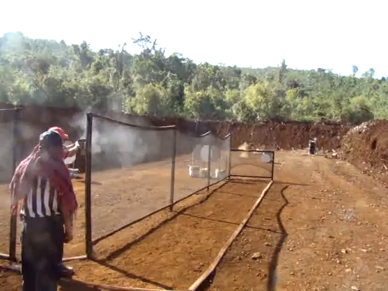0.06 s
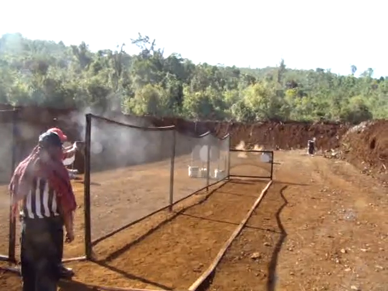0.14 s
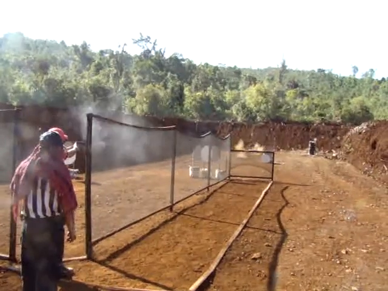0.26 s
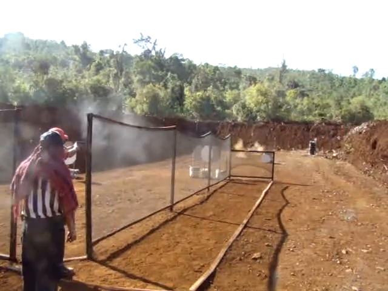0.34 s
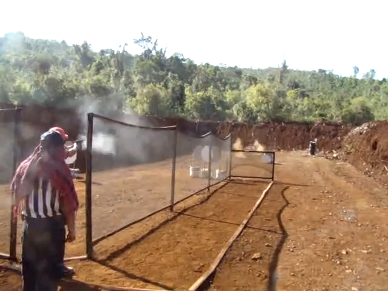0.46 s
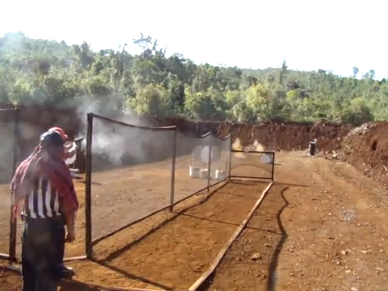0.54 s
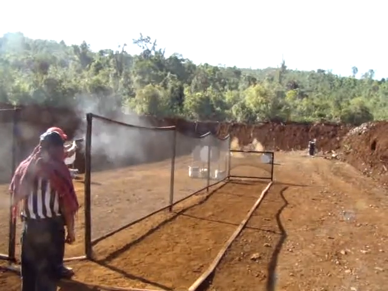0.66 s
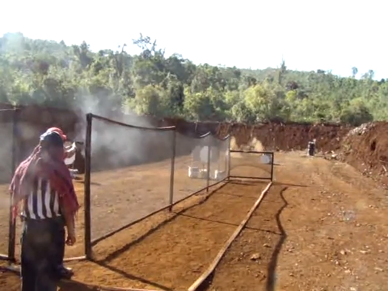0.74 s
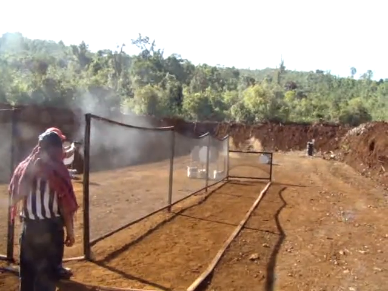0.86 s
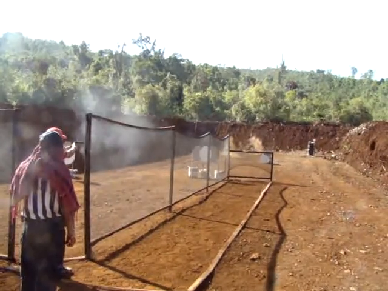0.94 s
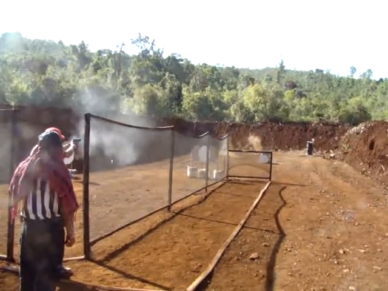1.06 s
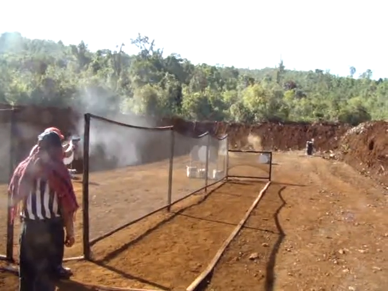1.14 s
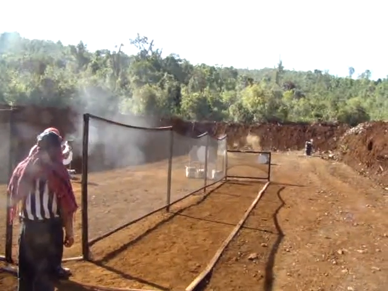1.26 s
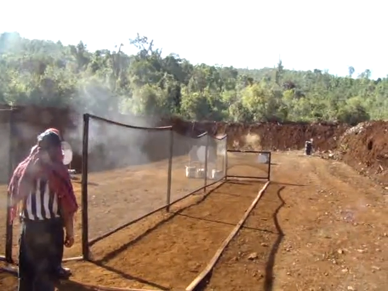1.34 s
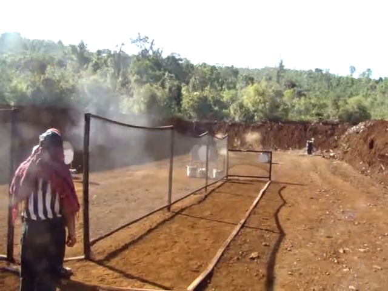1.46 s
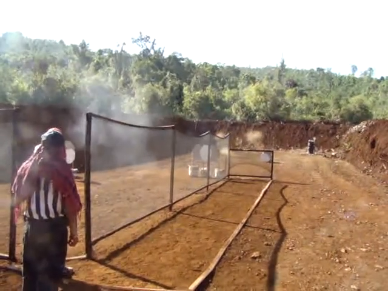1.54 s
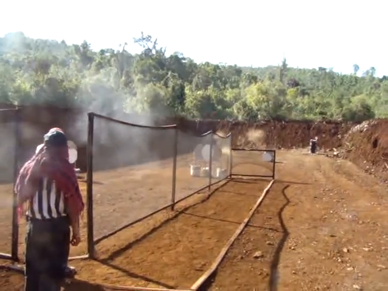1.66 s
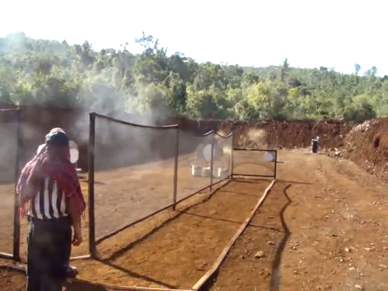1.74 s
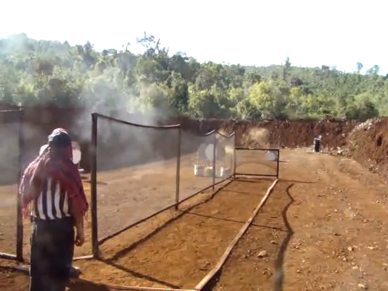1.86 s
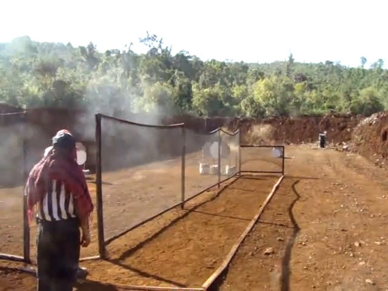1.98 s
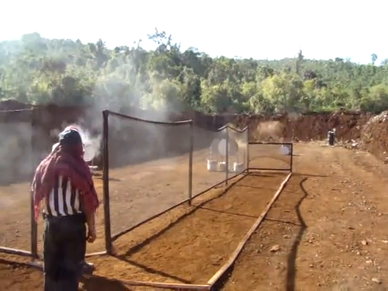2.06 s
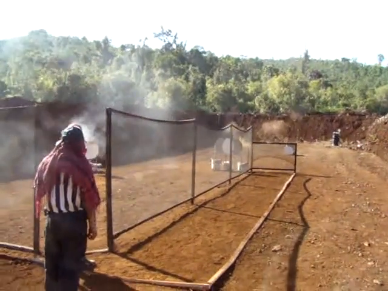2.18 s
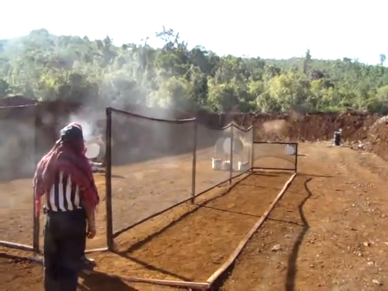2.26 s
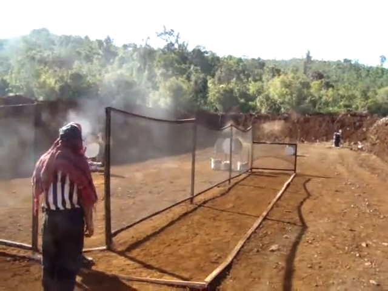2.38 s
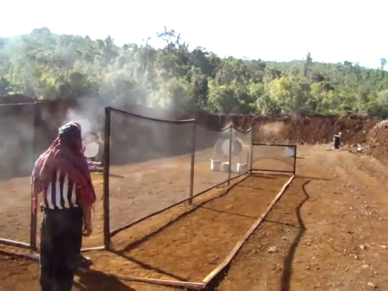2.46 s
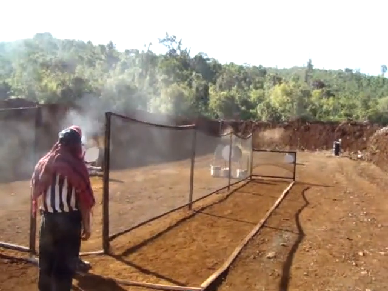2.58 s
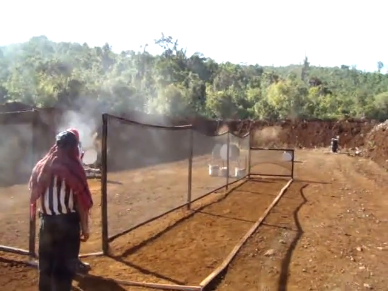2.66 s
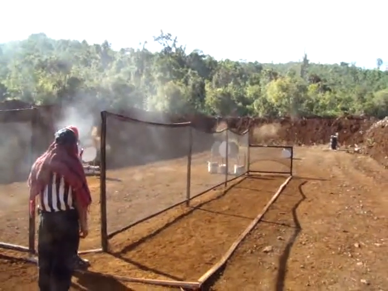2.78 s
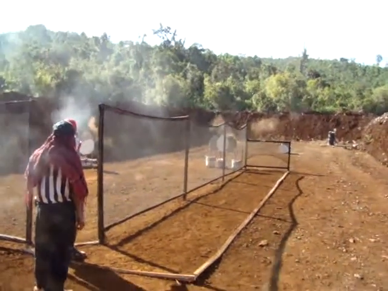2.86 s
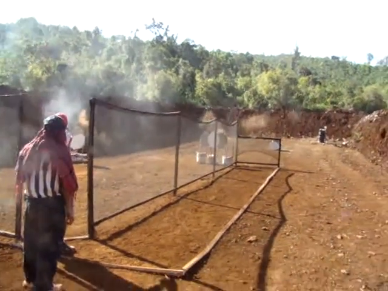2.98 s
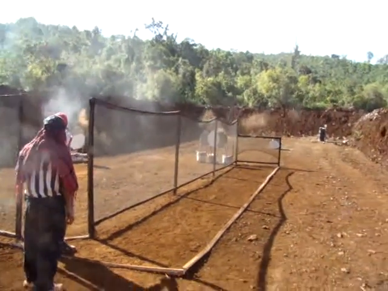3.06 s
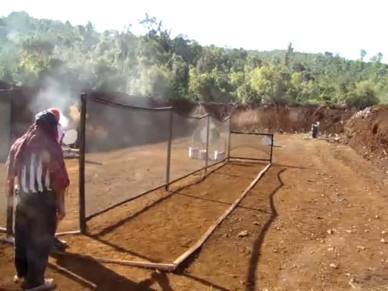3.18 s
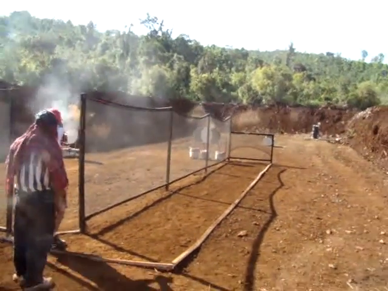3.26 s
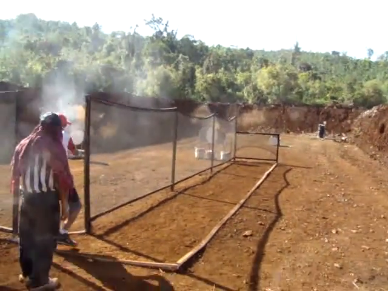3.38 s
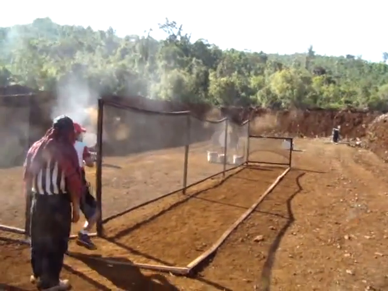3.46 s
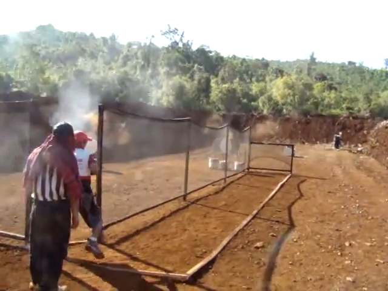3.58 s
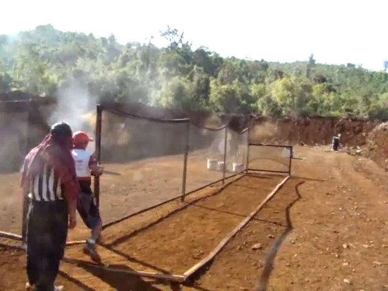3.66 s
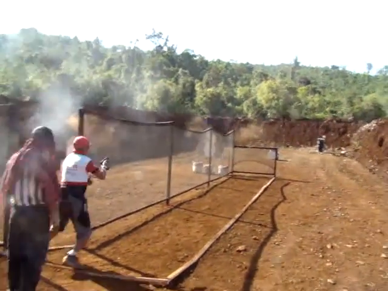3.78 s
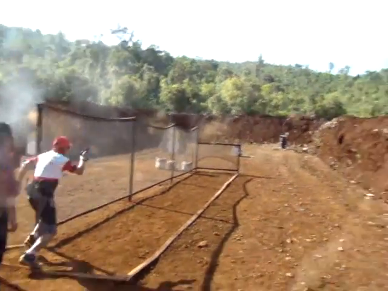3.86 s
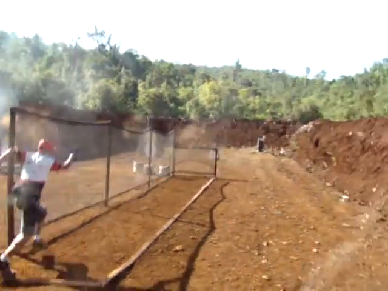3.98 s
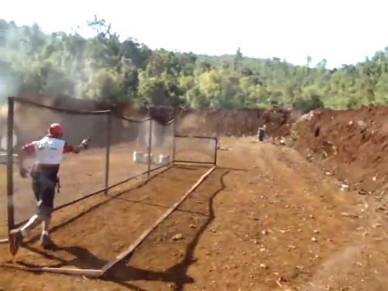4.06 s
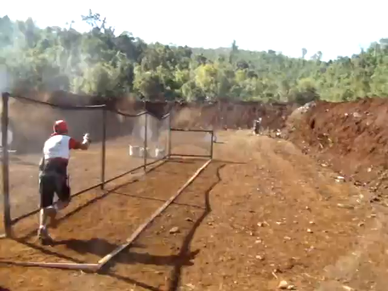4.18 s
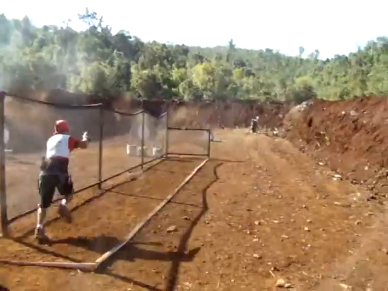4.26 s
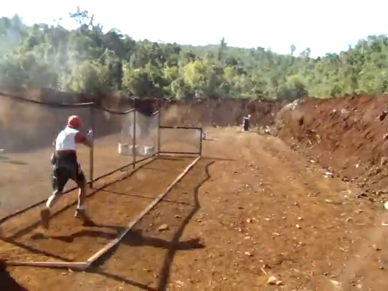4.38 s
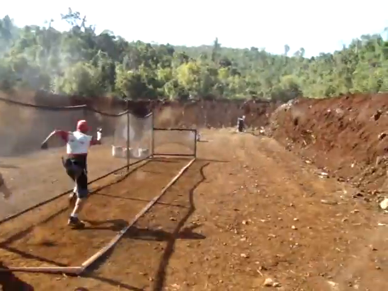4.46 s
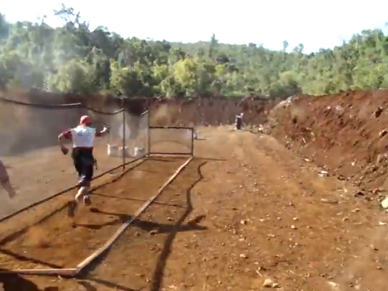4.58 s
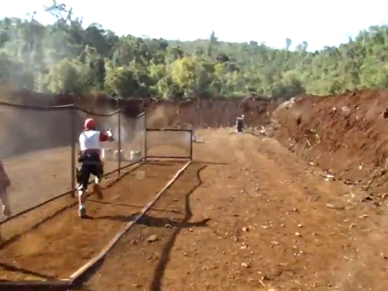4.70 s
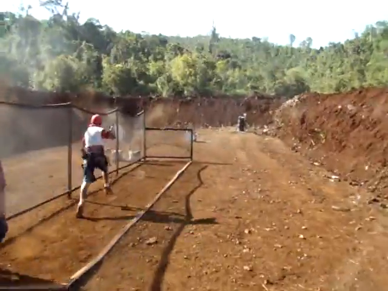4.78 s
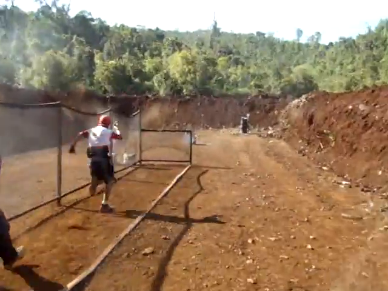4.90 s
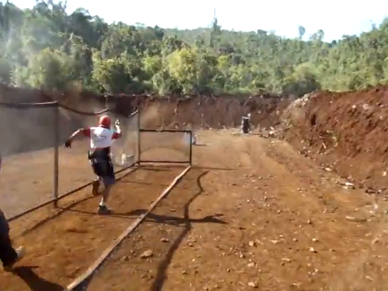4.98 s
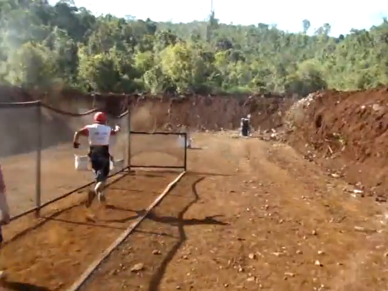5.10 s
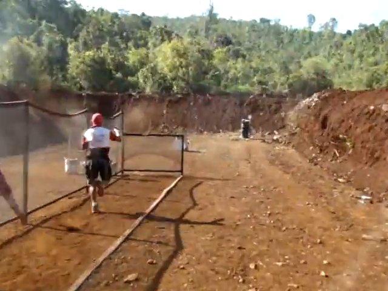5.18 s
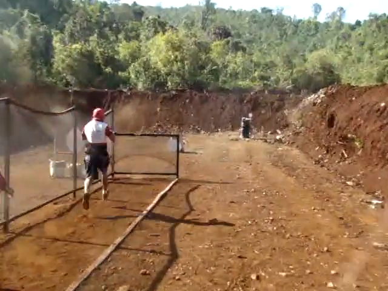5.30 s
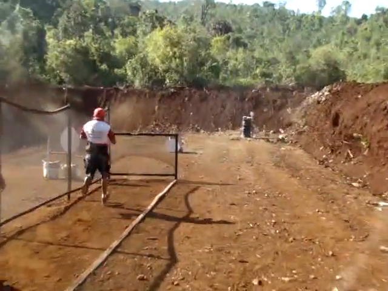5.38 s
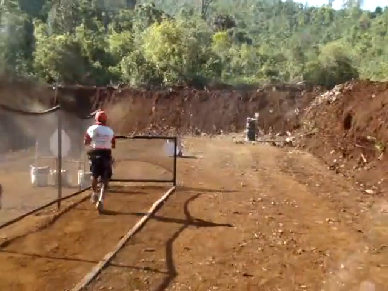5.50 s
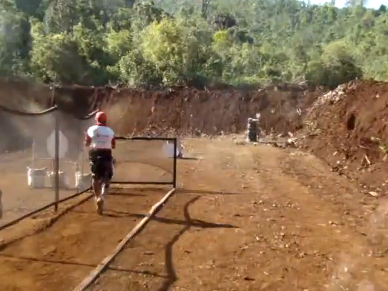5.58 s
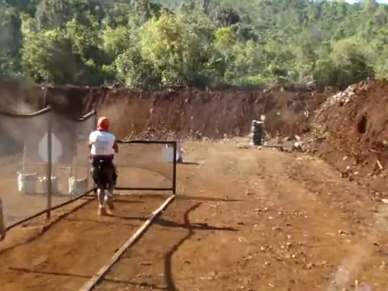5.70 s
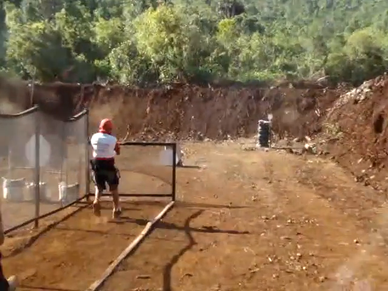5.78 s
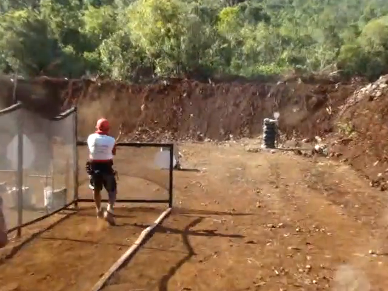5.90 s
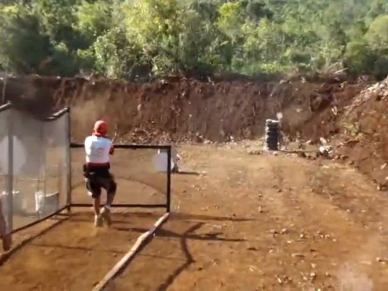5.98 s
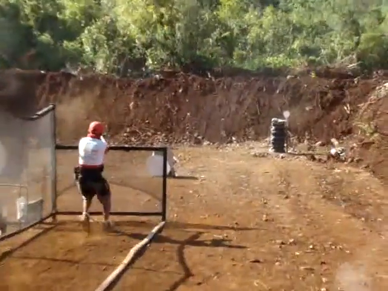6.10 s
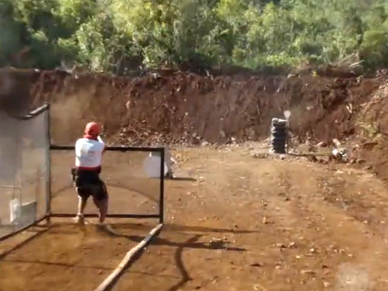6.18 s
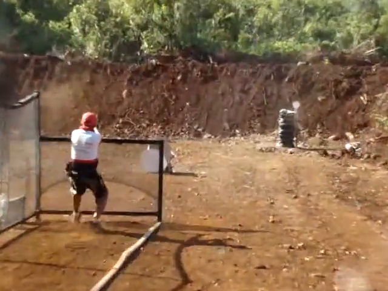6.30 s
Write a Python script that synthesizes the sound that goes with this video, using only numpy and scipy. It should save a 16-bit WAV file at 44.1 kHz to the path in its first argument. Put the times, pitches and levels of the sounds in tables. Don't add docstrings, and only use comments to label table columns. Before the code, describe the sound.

Six overloaded handgun shots crack in two strings of three on an open-air range, echoing off earth banks, then boots run crunching over dry gravel.

```python
import sys
import numpy as np
from scipy import signal
from scipy.io import wavfile
from scipy.ndimage import uniform_filter1d

SR = 44100
rng = np.random.default_rng(int(sys.argv[2]) if len(sys.argv) > 2 else 0)


def elevation(decibels):
    levels = np.asarray(decibels, float)
    return 10 ** (levels / 20)


def store_wav(level_fs):
    pcm = np.round(np.clip(np.atleast_2d(level_fs), -1, 1) * 32767)
    wavfile.write(sys.argv[1], SR, pcm.T.astype(np.int16))


N = 279808

# (time [s], level [dB], blast pitch [Hz],
# dull hush ahead of it [s], hush keeps only sound under [Hz])
SHOTS = [
    (-0.104, 3, 3000, 0, 100),
    (0.0453, 1, 3000, 0.018, 3080),
    (0.6379, -0.5, 2970, 0.032, 1500),
    (1.1521, -2, 3180, .009, 298),
    (2.179, 1, 2260, .028, 60),
    (2.723, -1, 2400, 0.03, 1460),
    (3.3193, -1.5, 2400, .015, 218),
]
# (back bank slap peak [dB], hill answer [dB])
AIM = [(-30, -12), (-6.5, 0), (-8, 0), (-7, 0), (-7.5, 0), (-9.5, 0), (-11, 0)]
# (delay [s], crack [dB], thump [dB], smear [s])
SLAPS = [(.0022, -3, -7.5, 0.0018), (.0038, -3, -5, 0.00048), (.0095, -26, -18, 0.0011),
         (0.0168, -2, -10.5, 0.0005), (0.022, -32, -15.5, 0.0048), (.033, -30, -26, .002),
         (0.0469, 0, -16, 0.00055), (.050, -4, -10, 0.00076), (0.0555, -20, -25, 0.0004),
         (.172, -30, -34, 0.032)]
# (delay [s], level [dB], smear [s], centre [Hz])
HILL_ANSWERS = [(0.319, -77, 0.0062, 673), (.410, -41, 0.0043, 700), (.443, -31, 0.01, 550),
                (0.479, -39, 0.011, 620), (.508, -35.5, 0.0055, 750), (.532, -35, 0.018, 534),
                (.545, -36, 0.015, 756), (.615, -35.5, .006, 640), (.665, -39, 0.008, 690),
                (0.786, -36, 0.0024, 700), (.810, -45, .005, 704), (.895, -49, 0.0087, 715)]
# (centre [Hz], between banks [dB], its t60 [s], off the hill [dB], its t60 [s])
SCATTER = [(225, -62, 0.92, -78.5, 2.6), (420, -33, 0.37, -60, 1.56), (881, -28, 0.49, -57.5, 6.8),
           (1500, -29, 0.41, -50.5, 3.9), (2400, -31.5, 0.62, -47.5, 3.6), (3095, -24.5, 0.47, -44.5, 3.2),
           (4120, -31.5, 0.64, -48, 3.37), (4900, -31.5, 0.8, -48, 3.5), (7500, -28, 0.72, -45.5, 2.2),
           (10600, -30, 0.34, -51, 1)]
# (centre [Hz], level [dB], which layer it rides on)
AIR_BANDS = [
    (35, -87, "steady"), (64, -83, "steady"),
    (60, -27, "rumble"), (132, -12.5, "rumble"), (283, -0.5, "rumble"),
    (550, -7.5, "wind"), (810, -11, "wind"), (1000, -5, "wind"),
    (1810, -8.5, "hiss"), (3000, -7, "hiss"), (4430, -7.5, "hiss"), (7100, -9, "hiss"), (9300, -9, "hiss")]
# (time [s], level under its rest [dB])
RECOVERY = [
    (4.1, -12),
    (4.4, -10),
    (5.05, -1),
    (5.32, -1),
    (5.6, 0.5),
    (6.34, 0),
]
# (start [s], end [s], lost above [Hz])
DROPOUTS = [(.146, .168, 8500), (1.376, 1.392, 7000), (4.284, 4.306, 6700), (4.855, 4.876, 4800),
            (5.644, 5.660, 8400), (5.826, 5.853, 8600), (5.826, 5.852, 4900), (4.262, 4.270, 7500),
            (5.968, 5.976, 5000), (5.987, 6.002, 5000)]
# (time [s], level [dB])
KNOCK = (.428, -33)
# (start [s], end [s], pitch [Hz], level [dB])
HUMS = [
    (.505, .632, 199, -62),
    (3.40, 3.548, 194, -62),
]
# (time [s], peak [dB], low part re peak [dB], centre [Hz])
TICKS = [(1.3688, -17, -22, 8200), (4.2737, -29, -6, 7500), (4.4499, -34.5, -6, 2600),
         (4.8785, -33, -10, 5200), (5.432, -34, -15, 8800), (5.0555, -29.5, -12, 2900),
         (5.665, -33, -15, 8600), (5.7214, -34, -15, 8800), (5.8567, -25, -6, 7000),
         (5.9789, -21, -3, 4600)]
# (time [s], crunch [dB], weight of the foot [dB], length [ms])
STEPS = [(4.2064, -41, -46, 9.1), (4.454, -49, -44, 10), (4.5462, -40, -45, 8.5), (4.7044, -36, -42, 9.4),
         (4.791, -36.5, -37.5, 9), (4.8787, -32, -60, 31), (4.945, -34, -36.5, 12), (5.017, -39, -59, 7.2),
         (5.0554, -30, -38.5, 7), (5.1803, -34, -37, 13), (5.264, -53, -39, 6.9), (5.2938, -35.5, -40, 26),
         (5.3533, -37, -45, 9), (5.389, -29.5, -53, 17), (5.432, -35, -40, 13), (5.4634, -42, -39.5, 17),
         (5.5367, -30.5, -43, 40), (5.5707, -34, -44, 13), (5.608, -41, -35, 6.3), (5.666, -40, -42, 18),
         (5.721, -30, -45, 5.5), (5.7924, -28, -27, 7.5), (5.815, -29, -30.5, 5), (5.991, -37, -39, 6.6),
         (6.173, -46, -38.5, 7.6), (6.2544, -47, -44, 8.8), (6.299, -39, -33, 33)]
# (time [s], peak [dB], pitch [Hz])
THUDS = [(4.72, -41, 523), (4.78, -43, 720), (5.26, -45, 1150), (5.466, -31, 1040), (5.572, -35, 710),
         (5.608, -37.5, 225), (5.812, -36, 230), (5.856, -36, 1100), (5.985, -37.5, 218), (5.992, -39, 640),
         (6.25, -34.5, 1120)]

BACK_S = .0955
NEAR_S, NEAR_DB = 0.041, 3
RUMBLE_DB, WIND_DB, HISS_DB = -57, -47.5, -48.5
RUMBLE_FOLLOWS, WIND_FOLLOWS = 1.65, 0.38
GRAVEL_HZ, GRAVEL_SPREAD, HEEL_DB = 3000, 0.21, -13
THUD_S, THUD_WIDTH = 0.018, 0.12
CLIP, CEILING, TOP_HZ = .63, .73, 10050


def band(x, hz, width_hz, order=1):
    low = np.sqrt(hz ** 2 + width_hz ** 2 / 4) - width_hz / 2
    edges = [low, min(low + width_hz, .45 * SR)]
    return signal.sosfilt(signal.butter(order, edges, "bandpass", fs=SR, output="sos"), x)


def noise_band(n, hz, width_hz):
    x = band(rng.standard_normal(n), hz, width_hz, order=2)
    return x / np.sqrt(np.mean(x ** 2))


def peak(x, db):
    return x * elevation(db) / np.max(np.abs(x))


def add(out, s, x):
    i = int(s * SR)
    x = x[max(-i, 0):len(out) - i]
    out[max(i, 0):max(i, 0) + len(x)] += x


def walk(rate):
    k = int(SR / rate)
    held = np.repeat(rng.standard_normal(N // k + 1), k)
    return 0.95 * uniform_filter1d(uniform_filter1d(held, k), k)[:N]


def burst(noise, length_s, front):
    x = noise * np.exp(-np.arange(len(noise)) / SR / max(length_s, 2e-4))
    x[:3] -= front
    return x


def crack(x):
    return band(x, 3510, 1470) + elevation(-3) * band(x, 2150, 1000) + elevation(-18) * band(x, 7240, 6000)


def thump(x):
    return 2.67 * band(x, 828, 736, order=2) + elevation(-13) * band(x, 450, 200)


def muzzle(hz, noise):
    t = np.arange(len(noise)) / SR
    swing = -np.sin(2 * np.pi * hz * (1.271 * t - 160 * t ** 2))
    swing *= np.exp(-(t / 0.0013) ** 2) * np.minimum(t / 0.0002, 1)
    return elevation(-1) * swing + elevation(-7) * band(burst(noise, 0.0018, front=0), 4000, 7700)


def near_slaps(out, surfaces):
    for (delay, crack_db, thump_db, smear), noise in zip(SLAPS, surfaces):
        own = rng.standard_normal(len(noise))
        x = burst(noise + .6 * own, smear, front=2.5) * elevation(1.2 * own[0] - 1)
        add(out, delay + 1.5e-4 * own[1], elevation(crack_db) * crack(x) + elevation(thump_db) * thump(x))


def hill_answers(out, surfaces, hill_db):
    for (delay, db, smear, hz), noise in zip(HILL_ANSWERS, surfaces[::-1]):
        x = burst(noise + 0.18 * rng.standard_normal(len(noise)), smear, front=5.0)
        add(out, delay, elevation(db + hill_db + 9) * band(x, hz, 0.42 * hz, order=2))


def scatter(t):
    n, out = len(t), np.zeros(len(t))
    near = elevation(NEAR_DB / (1 + np.exp(np.clip((t - NEAR_S) / 0.0017, -50, 50))))
    rise = 1 - np.exp(-t / 0.0057)
    grit = elevation(4.5 * np.exp(-t / 0.07) * walk(900)[:n])
    for hz, bank_db, bank_t60, hill_db, hill_t60 in SCATTER:
        fade = np.hypot(near * elevation(bank_db - 60 * t / bank_t60), elevation(hill_db - 60 * t / hill_t60))
        patchy = elevation(2.0 * walk(59.65)[:n])
        out += rise * fade * patchy * noise_band(n, hz, .5 * hz)
    out += elevation(-49 - 17 * t) * rise * noise_band(n, 3100, 470)
    return out * grit


def back_slap(peak_db):
    x = burst(rng.standard_normal(1000), .0013, front=3)
    return peak(crack(x) + elevation(-9) * thump(x) + elevation(-13) * band(x, 7000, 6000), peak_db)


def shots():
    out, t = np.zeros(N), np.arange(3 * SR) / SR
    surfaces = rng.standard_normal((12, 4000))
    swell = elevation(1.5 - 18500 * t[400::-1])
    for (s, db, hz, _, _), (back_db, hill_db) in zip(SHOTS, AIM):
        add(out, s - 2.5e-4, elevation(db) * muzzle(hz, rng.standard_normal(300)))
        answer = scatter(t)
        near_slaps(answer, surfaces)
        hill_answers(answer, surfaces, hill_db)
        add(out, s, elevation(db) * answer)
        add(out, s + BACK_S, back_slap(back_db + 1))
        add(out, s - len(swell) / SR, swell * band(rng.standard_normal(len(swell)), 3700, 8000))
    return signal.sosfilt(signal.butter(2, 170, "highpass", fs=SR, output="sos"), out)


def air():
    t, out = np.arange(N) / SR, np.zeros(N)
    s, under_db = np.transpose(RECOVERY)
    gain_db = np.interp(t, s, under_db)
    layers = {"steady": 0, "rumble": RUMBLE_DB + RUMBLE_FOLLOWS * gain_db,
              "wind": WIND_DB + WIND_FOLLOWS * gain_db, "hiss": HISS_DB + gain_db}
    shuffle, gravel = walk(30), walk(500) * (t > s[0])
    for hz, db, layer in AIR_BANDS:
        flicker_db = 2.0 * walk(40) * (hz < 1500) + .6 * walk(9) + .7 * shuffle
        flicker_db += 2.5 * gravel * (hz > 400)
        out += elevation(layers[layer] + db + flicker_db) * noise_band(N, hz, 0.56 * hz)
    return out


def knock():
    out = np.zeros(N)
    s, db = KNOCK
    add(out, s, elevation(db) * thump(burst(rng.standard_normal(2000), 0.0024, front=1.2)))
    return out


def drive_hums():
    t, out = np.arange(N) / SR, np.zeros(N)
    for start, end, hz, db in HUMS:
        tone = np.sin(2 * np.pi * hz * t) + .5 * np.sin(4 * np.pi * hz * t)
        out += elevation(db + 5.5) * ((t > start) & (t < end)) * tone
    return out


def ticks():
    out = np.zeros(N)
    for s, db, low_db, hz in TICKS:
        x = burst(rng.standard_normal(2000), .0020, front=1.5)
        add(out, s, peak(band(x, hz, .9 * hz), db) + peak(band(x, 1200, 1200), db + low_db))
    return out


def footsteps():
    out = np.zeros(N)
    for s, db, weight_db, ms in STEPS:
        stones, grains, sole, ground = rng.standard_normal((4, 5000))
        hz, length = GRAVEL_HZ * np.exp(GRAVEL_SPREAD * grains[-1]), ms / 1000
        onset = np.minimum((np.arange(len(stones)) + 20) / SR / (0.11 * length), 1)
        grit = burst(stones * elevation(7.1 * grains), length, front=1.6) * onset
        crunch = band(grit, hz, 0.42 * hz) + elevation(-12.5) * band(grit, 3000, 10500)
        scuff = thump(burst(sole, 1.37 * length, front=1.0))
        heel = band(burst(ground, 2.0 * length, front=6.7), 254, 160, order=2)
        add(out, s, elevation(db - 7) * crunch)
        add(out, s, elevation(weight_db - 0.5) * scuff + elevation(weight_db + HEEL_DB + 14) * heel)
    return out


def thuds():
    out = np.zeros(N)
    for s, db, hz in THUDS:
        x = burst(rng.standard_normal(3000), THUD_S, front=2.8)
        add(out, s, peak(band(x, hz, THUD_WIDTH * hz + 40), db))
    return out


def hush_before_shots(x, rest):
    for s, _, _, ahead, keep_hz in SHOTS[1:]:
        i, j = int((s - ahead) * SR), int((s - .004) * SR)
        lowpass = signal.butter(8, keep_hz, fs=SR, output="sos")
        low = signal.sosfiltfilt(lowpass, x[max(i - 2000, 0):j])
        k = np.arange(j - i)
        gate = np.clip(np.minimum(k, j - i - k + 30) / 60, 0, 1)
        x[i:j] += gate * (low[i - j:] - x[i:j])
        x[j:j + 176] -= rest[j:j + 176]


def scene():
    blast = shots()
    rest = air() + knock() + drive_hums() + ticks() + footsteps() + thuds()
    x = blast + rest
    hush_before_shots(x, rest)
    return np.array([x, x])


def treble_dropouts(x):
    hz, s, z = signal.stft(x, SR, nperseg=256)
    edges = 3000 * 1.13 ** np.arange(11)
    wake = np.zeros(len(s))
    for t, *_ in SHOTS:
        wake += (s > t + .018) & (s < t + .125) & (abs(s - t - BACK_S) > .007)
    for t, *_ in TICKS:
        wake += .4 * (abs(s - t) < .03)
    odds = np.clip((edges[:, None] - 2500) / 7500, 0, 1) * (.09 + .5 * wake)
    draws = np.repeat(rng.random((len(edges), len(s) // 3 + 1)), 3, axis=1)[:, :len(s)]
    lost = draws < odds
    band_of = np.clip(np.searchsorted(edges, hz) - 1, 0, None)
    keep = ~lost[band_of] | (hz[:, None] < edges[0])
    for start, end, above_hz in DROPOUTS:
        keep[np.ix_(hz > above_hz, (s > start) & (s < end))] = False
    return signal.istft(z * keep, SR, nperseg=256)[1][..., :N]


def low_pass(x):
    return signal.sosfilt(signal.butter(12, 16000, fs=SR, output="sos"), x)


def record(dry):
    squash = dry - dry / (1 + np.abs(dry / CLIP) ** 5) ** (1 / 5)
    x = dry - signal.sosfiltfilt(signal.butter(1, 60, "highpass", fs=SR, output="sos"), squash)
    x = treble_dropouts(x)
    x = signal.sosfilt(signal.ellip(10, .2, 90, TOP_HZ, fs=SR, output="sos"), x)
    return low_pass(np.clip(x, -CEILING, CEILING))


dry = scene()
out = record(dry)
store_wav(out)
```